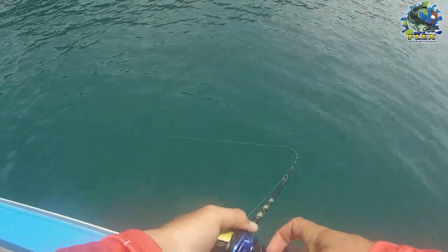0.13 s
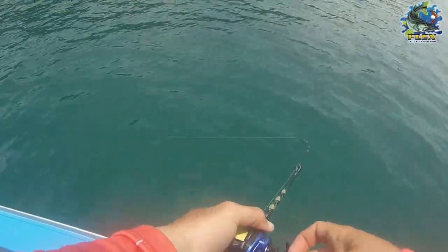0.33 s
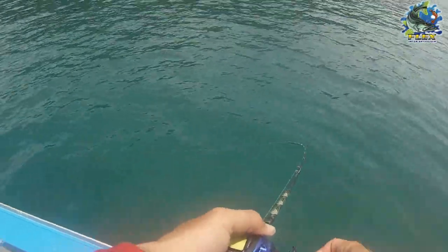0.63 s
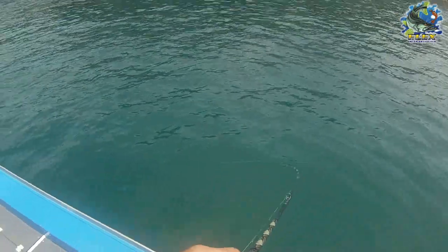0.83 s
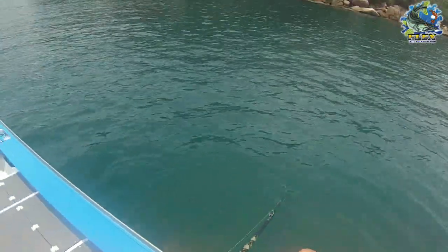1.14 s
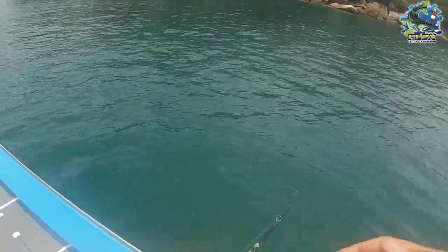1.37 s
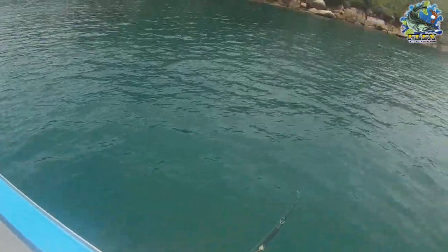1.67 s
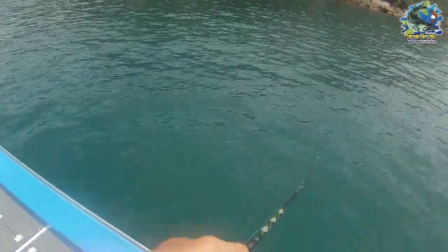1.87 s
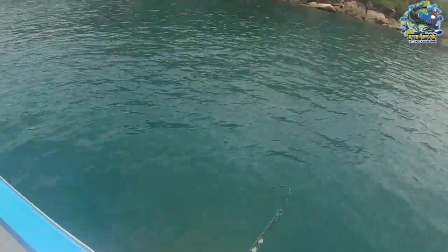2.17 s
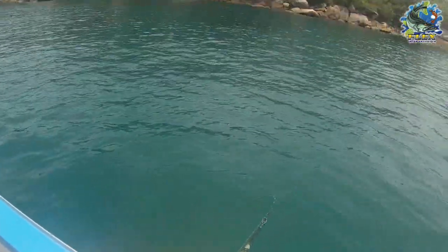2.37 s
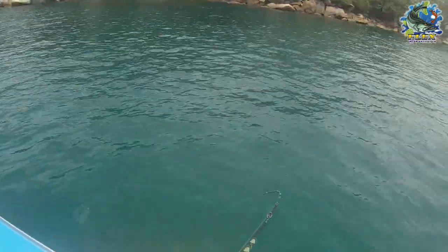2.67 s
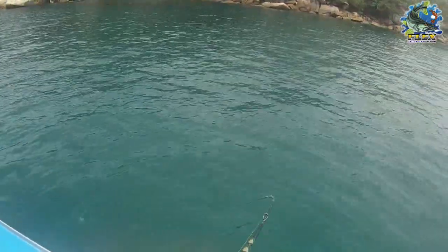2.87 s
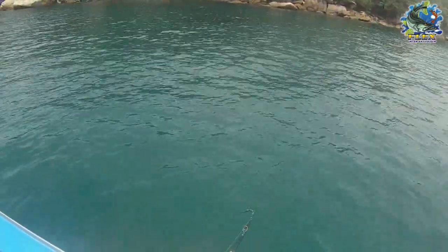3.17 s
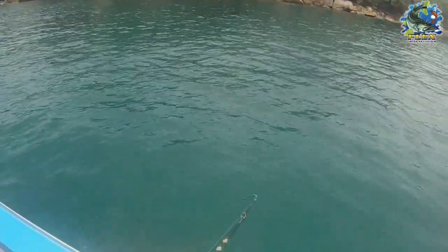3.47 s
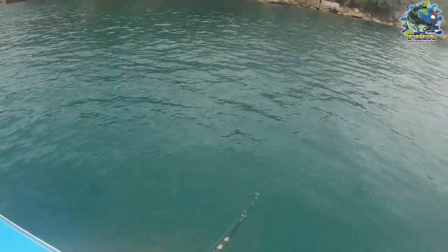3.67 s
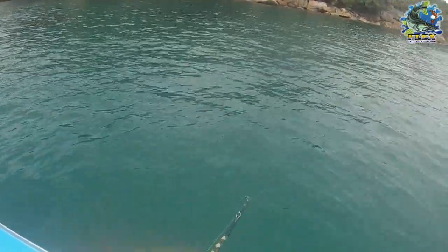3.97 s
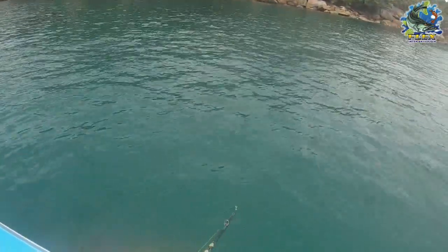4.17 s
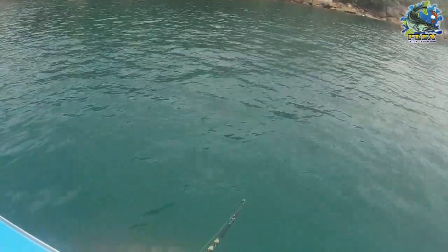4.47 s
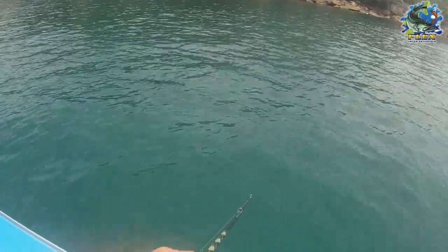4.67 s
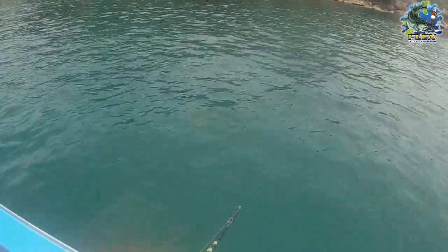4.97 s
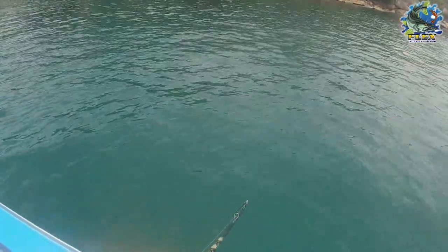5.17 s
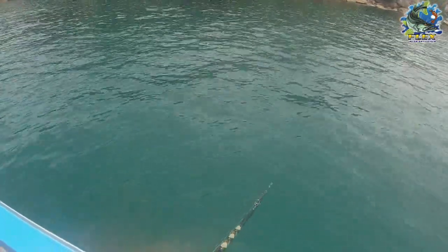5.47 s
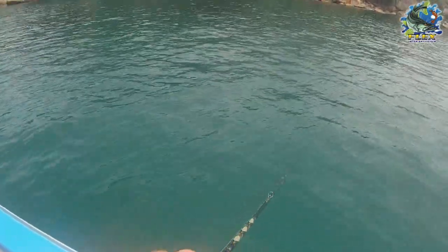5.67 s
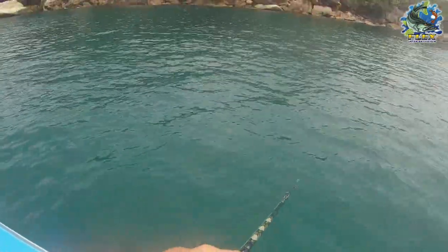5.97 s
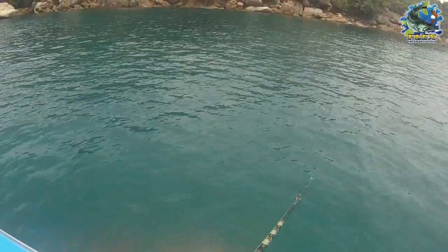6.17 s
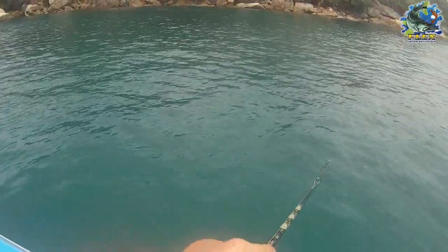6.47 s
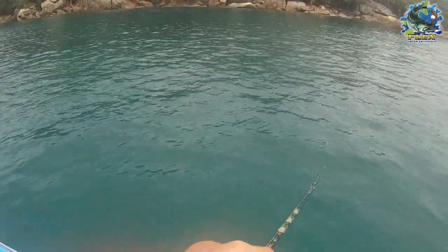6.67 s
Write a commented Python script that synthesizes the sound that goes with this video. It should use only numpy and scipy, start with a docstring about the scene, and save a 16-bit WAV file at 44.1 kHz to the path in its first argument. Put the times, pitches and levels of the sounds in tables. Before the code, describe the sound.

Feet and fishing gear bump and scrape against a small boat, thinning to occasional knocks while calm water laps quietly.

```python
"""Feet and gear knock against the hull of a small boat as someone fishes on calm water.
Each blow is a short rattle of contacts that excites the modes of the hull's panels and rebounds once.
Tackle clicks and rings, gear slides by stick-slip friction, a reel whirrs and the line hisses.
Behind these, water laps and plops, two faint whistles rise, and light wind rumbles on the microphone."""
import sys
import numpy as np
from scipy import signal
from scipy.fft import rfft, irfft
from scipy.io import wavfile

SR = 44100
rng = np.random.default_rng(int(sys.argv[2]) if len(sys.argv) > 2 else 0)


def bounce(signal):
    """Save signal as a 16-bit WAV file at the path given by the first command-line argument."""
    frames = np.transpose(np.atleast_2d(signal))
    limited = np.clip(frames, -1, 1)
    pcm = np.round(limited * 32767).astype(np.int16)
    wavfile.write(sys.argv[1], SR, pcm)


N = 300321
TIME = np.arange(N) / SR
LEAD = 512  # samples of padding on each side of a blow

# normal modes of the hull: f/Hz, relative level/dB, T60/s
HULL_MODES = [(55.5, -9.5, 0.3), (159, -8.5, 0.14), (219.6, 1, 0.21), (266.1, 1, 0.27), (335, 4.5, 0.124),
              (372, 3, 0.167), (463.2, 4, 0.13), (571.5, 0.5, 0.12), (611.5, -3.5, 0.12), (757, 2, 0.082),
              (783, 0, 0.025), (993, 3, 0.089), (1090, -9, 0.11), (1314, -7, 0.13), (1706, -1.5, 0.039),
              (1904, -2, 0.035), (2715, -5.5, 0.037), (2823, -9.5, 0.1), (2920, 0.5, 0.03),
              (3720, -3, 0.032), (4400, -16, 0.016), (5290, -9.5, 0.045), (5400, -16, 0.039)]
# normal modes of a metal fitting: f/Hz, relative level/dB, T60/s
FITTING_MODES = [(1240, 7, 0.051), (1715, 5.5, 0.066), (2270, -3, 0.07), (3030, -9, .05),
                 (3550, -10, 0.046), (4100, 0, 0.052), (5060, -3.5, .055), (5450, -5.5, 0.068),
                 (7620, -12, 0.056), (7900, -15, 0.028), (9940, -13, 0.069), (10380, -19, .03)]


def undb(db):
    """Amplitude ratio of a level in decibels."""
    return 10 ** (np.asarray(db) / 20)


def unit(x, count=None):
    """Normalise to rms 1, taken over the first count samples (default: all)."""
    return x / np.sqrt(np.mean(x[:count] ** 2) + 1e-18)


def at(points, hz):
    """Interpolate (f/Hz, value) points on a logarithmic frequency axis."""
    f, value = np.transpose(points)
    return np.interp(np.log(np.maximum(hz, 1)), np.log(f), value)


def colour(x, points):
    """Spectral shaping by (f/Hz, level/dB) points; rms 1."""
    gain = undb(at(points, np.fft.rfftfreq(len(x), 1 / SR)))
    return unit(irfft(rfft(x) * gain, len(x)))


def band(x, lo_hz, hi_hz, order=2):
    """Causal band-pass filter."""
    edges = [lo_hz, min(hi_hz, SR / 2 - 1000)]
    return signal.sosfilt(signal.butter(order, edges, "band", fs=SR, output="sos"), x)


def fade(t, t60):
    """Exponential decay by 60 dB in t60."""
    return np.exp(-np.log(1000) * t / t60)


def swell(start, length, attack, t60):
    """Envelope: linear attack, hold until start + length, exponential decay; all in s."""
    age = TIME - start
    return np.clip(age / attack, 0, 1) * fade(np.maximum(age - length, 0), t60)


def walk(rate_hz):
    """Random modulation: straight lines between Gaussian values, spread near 1."""
    knots = rng.standard_normal(1000)
    return np.interp(TIME * rate_hz, np.arange(len(knots)), knots)


def grains(size, spread_db):
    """Granular noise: dense impulses with log-normal weights; rms 1."""
    return unit(rng.standard_normal(size) * undb(spread_db * rng.standard_normal(size)))


def add(out, start, x):
    """Superpose x on out from start/s."""
    i = int(start * SR)
    out[i:i + len(x)] += x[:N - i]


def modal_response(modes, t, scatter=0.):
    """One damped sine per mode; a random point of contact sets its sign and slight detuning."""
    chance = rng.standard_normal((len(modes), 2))
    return sum(np.sign(side) * undb(db) * fade(t, t60)
               * np.sin(2 * np.pi * hz * (1 + scatter * shift) * t)
               for (hz, db, t60), (side, shift) in zip(modes, chance))


def registers(x):
    """Complementary filters split x into thump, body, clack and crack, from low to high."""
    # crossovers between the registers: f/Hz
    crossovers = (150, 700, 2200)
    f, spectrum = np.fft.rfftfreq(len(x), 1 / SR), rfft(x)
    lowpasses = [0, *(1 / (1 + (f / hz) ** 8) for hz in crossovers), 1]
    return [irfft(spectrum * (upper - lower)) for lower, upper in zip(lowpasses, lowpasses[1:])]


def microphone_hiss(level_db=-69.5):
    """Self-noise of the microphone: steady and broadband."""
    # noise spectrum: f/Hz, relative level/dB
    spectrum = [(1000, -1.5), (6000, -1), (11000, -6), (12500, -7), (15000, -21)]
    return undb(level_db) * colour(rng.standard_normal(N), spectrum)


def wind(breeze_db=-53, gust_width_s=0.23, buffet_db=3):
    """Turbulent pressure on the microphone makes a rumble that swells in gusts."""
    # gusts: t/s, rise in level/dB
    gusts = [(2.35, 5), (5.5, 3), (6.78, 7)]
    # rumble spectrum: f/Hz, relative level/dB
    spectrum = [(15, -20), (30, 8), (50, -0.5), (80, 0), (130, -4), (300, -43), (1000, -46.5)]
    gust_db = sum(db * np.exp(-((TIME - peak) / gust_width_s) ** 2) for peak, db in gusts)
    return colour(rng.standard_normal(N), spectrum) * undb(breeze_db + gust_db + buffet_db * walk(9))


def water_and_rustle(ripple_db=4, lap_db=-5, lap_spread_db=4):
    """Amplitude-modulated noise: ripples, laps that sound in the hull, and a brief handling rustle."""
    # level of water ripples and laps, with a swell of handling rustle near 0.7 s
    # as the reel is cranked: t/s, level/dB
    levels = [(0, -54), (.42, -55.5), (.7, -44.5), (1.3, -53), (2.05, -48), (2.9, -54.5), (4.1, -55.5),
              (4.35, -49.5), (5.1, -52), (6.8, -51.5)]
    # ripple spectrum: f/Hz, relative level/dB
    spectrum = [(100, -19), (170, -1), (243, -8), (310, -6.5), (442, -7), (523, -5), (776, -8), (1150, -10),
                (1470, -16), (1770, -15), (2140, -25), (2990, -24.5), (3480, -29.5), (5350, -32.5),
                (8000, -46), (15000, -73)]
    ripples = colour(grains(N, 5.6), spectrum) * undb(ripple_db + 0.69 * walk(14))
    laps = unit(band(rng.standard_normal(N), 210, 495)) * undb(lap_db + lap_spread_db * walk(8.1))
    return undb(np.interp(TIME, *np.transpose(levels))) * (ripples + laps)


def whistles(waver=0.016, flutter_db=4):
    """Frequency-modulated tones, thin and unsteady, swell and fade as their pitch rises and levels off."""
    # glides: t/s, duration/s, first f/Hz, last f/Hz, level/dB
    glides = [(3.39, .21, 6000, 7300, -73), (3.44, .19, 5150, 6200, -74)]
    out = np.zeros(N)
    for start, length, first_hz, last_hz, db in glides:
        progress = np.clip((TIME - start) / length, 0, 1)
        hz = (last_hz + (first_hz - last_hz) * (1 - progress) ** 2) * (1 + waver * walk(140))
        envelope = undb(db + flutter_db * walk(90)) * np.sin(np.pi * progress)
        out += envelope * np.sin(2 * np.pi * np.cumsum(hz) / SR)
    return out


def line_rubbing(grain_db=6, uneven_db=2):
    """Sliding friction of line and grip gives short, grainy hisses."""
    # strokes: t/s, duration/s, level/dB
    strokes = [(1.721, 0.041, -45), (1.807, 0.024, -43), (2.262, 0.025, -40)]
    # friction spectrum: f/Hz, relative level/dB
    spectrum = [(800, 1), (2000, 12.5), (5000, 5), (7200, -3), (9000, -8.5), (12500, -3.5), (15000, -3)]
    envelope = sum(undb(db) * swell(start, length, attack=0.02, t60=0.12) for start, length, db in strokes)
    return colour(grains(N, grain_db), spectrum) * envelope * undb(uneven_db * walk(43.64))


def reel(level_db=-52, usual_hz=2540, db_per_octave=10, whirr_db=-3, rub_db=-2, half_width_hz=260):
    """Gears whirr as narrow-band noise that follows the crank; line and bearings rub. Faster is louder."""
    # gear whirr under uneven cranking: t/s, f/Hz
    turns = [(.45, 1900), (.59, 2240), (.68, 2850), (.76, 2190), (.865, 3300), (.95, 2320), (1.005, 3100),
             (1.08, 2125), (1.2, 1900)]
    # friction spectrum of line and bearings: f/Hz, relative level/dB
    spectrum = [(300, 4), (900, -18), (1700, 6), (2300, 9.5), (2650, -9), (3050, 9.5), (3500, -6),
                (5500, -9), (8000, -47), (14000, -33)]
    hz = np.interp(TIME, *np.transpose(turns))
    phase = 2 * np.pi * np.cumsum(hz) / SR
    lowpass = signal.butter(2, half_width_hz, fs=SR, output="sos")
    quadrature = unit(signal.sosfilt(lowpass, rng.standard_normal((2, N))))
    whirr = quadrature[0] * np.cos(phase) + quadrature[1] * np.sin(phase)
    rub = colour(grains(N, 5), spectrum)
    cranking = swell(start=0.35, length=0.79, attack=0.19, t60=0.3)
    gain = undb(level_db + db_per_octave * np.log2(hz / usual_hz) + walk(35.5))
    return cranking * gain * (undb(whirr_db) * whirr + undb(rub_db) * rub)


def sliding_gear(jerk_db=4, scratch_db=-9, hum_hz=152, hum_db=-43.5, waver=0.023):
    """Stick-slip friction drives the hull's low modes and a metal fitting; one panel hums along."""
    # arms and gear dragging on the hull: t/s, duration/s, level/dB
    drags = [(0.43, 0.62, -41.5), (1.582, 0.22, -39.5), (2.06, 0.34, -39), (4.142, .29, -38)]
    # gear jerking over the fitting: t/s, level/dB
    slips = [(4.11, -41), (4.174, -50), (4.22, -49.5), (4.257, -48), (4.292, -49), (4.379, -49),
             (4.481, -53.5), (4.63, -57.5), (4.7, -60.5)]
    t = np.arange(2 ** 14) / SR
    friction = grains(N, 6) * undb(jerk_db * walk(56))
    hull = unit(band(signal.fftconvolve(friction, modal_response(HULL_MODES, t))[:N], 147, 600))
    fitting = unit(signal.fftconvolve(friction, modal_response(FITTING_MODES, t))[:N])
    scratch = undb(scratch_db) * unit(band(friction, 940, 4000, order=1))
    hum_phase = 2 * np.pi * np.cumsum(hum_hz * (1 + waver * walk(25))) / SR
    hum = unit(np.sin(hum_phase) * undb(jerk_db * walk(38)))
    dragging = sum(undb(db) * swell(start, length, attack=0.023, t60=1) for start, length, db in drags)
    slipping = sum(undb(db) * swell(start, 0.014, attack=0.0076, t60=0.16) for start, db in slips)
    humming = undb(hum_db) * swell(start=4.27, length=0.6, attack=0.056, t60=0.99)
    return dragging * hull + slipping * (fitting + scratch) + humming * hum


def rings_and_plops(rise_s=0.0036):
    """Damped oscillators, most gliding in pitch; a plop glides as its air pocket changes."""
    # rings of gear, hollow booms and plops: t/s, f/Hz, level/dB, T60/s, relative glide/(1/s)
    tones = [(.628, 730, -5.5, 0.048, 2.7), (0.63, 973, -17, 0.13, -.19), (.993, 107, -29.5, 0.14, .85),
             (1.796, 45.3, -26, .13, 6), (2.354, 7530, -50, 0.2, 0), (3.029, 1680, -41, 0.59, 0),
             (3.029, 4980, -56, 0.51, -0.5), (3.064, 493, -17.5, 0.088, .41),
             (3.937, 119, -27.5, 0.43, 0.6), (4.864, 1303, -24.5, 0.18, 1.2),
             (4.865, 2805, -22.5, 0.074, -1), (4.867, 3004, -22, 0.069, -3.5),
             (4.869, 5150, -20, 0.041, 1.2), (5.255, 660, -25, 0.031, 0), (5.365, 501, -35.5, 0.32, 1.7),
             (6.748, 2940, -29.5, .06, 0.5)]
    out, t = np.zeros(N), np.arange(2 ** 14) / SR
    for start, hz, db, t60, glide in tones:
        envelope = undb(db) * (1 - np.exp(-t / rise_s)) * fade(t, t60)
        add(out, start, envelope * np.sin(2 * np.pi * hz * (t + glide * t ** 2 / 2)))
    return out


def tackle_clicks(edge_ratio=1.41):
    """Hard, heavily damped contacts radiate octave-wide bursts of noise."""
    # snaps of gear and tackle: t/s, level over the first 3 ms/dB, centre f/Hz, T60/s
    snaps = [(0.43, -55, 4500, 0.015), (0.595, -39, 2680, 0.02), (1.064, -61, 5500, .04),
             (1.281, -50, 2560, 0.017), (1.358, -43, 2860, .015), (1.3735, -37, 870, 0.012),
             (1.375, -47.5, 5000, .02), (1.7012, -41.5, 4900, .053), (1.709, -30.5, 2600, 0.0075),
             (1.795, -22, 1460, 0.02), (1.795, -34.5, 3860, 0.022), (2.001, -22.5, 4100, .007),
             (2.002, -30.5, 1500, 0.011), (2.036, -18, 3400, 0.016), (2.038, -7.5, 810, 0.0038),
             (2.0351, -16.5, 2130, 0.016), (2.102, -46, 5570, 0.026), (2.139, -29, 780, 0.039),
             (2.21, -43, 900, .02), (2.245, -44.5, 4830, .0097), (2.354, -32, 1100, 0.018),
             (2.354, -44, 6600, .04), (2.421, -40, 1020, 0.016), (3.028, -56, 8400, 0.049),
             (3.083, -45, 4150, 0.094), (3.187, -56, 4170, 0.058), (3.919, -47.5, 7400, 0.042),
             (4.8657, -30, 1630, 0.027), (4.871, -34, 4450, .045), (6.175, -54, 3200, .015),
             (6.489, -56, 3200, .018), (6.682, -48.5, 4870, 0.0081), (6.749, -36, 2000, 0.021)]
    out, t = np.zeros(N), np.arange(2 ** 12) / SR
    for start, db, hz, t60 in snaps:
        burst = rng.standard_normal(len(t)) * fade(t, t60)
        snap = band(burst, hz / edge_ratio, hz * edge_ratio, order=3)
        add(out, start, undb(db) * unit(snap, count=130))
    return out


def dense_modes(t, direct_db=9, direct_t60=0.028):
    """Overlapping hull modes merge into noise: a direct burst, then a tail whose lows ring longest."""
    # spectrum of the ringing: f/Hz, relative level/dB
    spectrum = [(25, -9), (60, -19), (130, -2), (185, 1.5), (300, 3), (900, 4), (1700, -8.5), (2250, -14.5),
                (2900, -19.5), (3500, -12.5), (4500, -14.5), (5400, -24), (6400, -44), (10000, -35.5),
                (15000, -63)]
    # its decay times: f/Hz, T60/s
    decay_times = [(60, 1), (300, 0.53), (900, 0.21), (2500, 0.11), (12000, 0.15)]
    f = np.fft.rfftfreq(len(t), 1 / SR)
    noise = rfft(rng.standard_normal(len(t))) * undb(at(spectrum, f))
    edges = np.geomspace(20, 20480, 21)  # half-octave bands
    direct = undb(direct_db) * fade(t, direct_t60)
    out = np.zeros(len(t))
    for lo, hi in zip(edges, edges[1:]):
        tail = fade(t, at(decay_times, np.sqrt(lo * hi)))
        out += irfft(noise * ((f >= lo) & (f < hi))) * (direct + tail)
    return out


def blow(thump_db, clack_db, crack_db, panel_hz, contact_ms, fitting_db=-15, note_db=-4, note_t60=0.092):
    """Impact: a chattering contact force convolved with the impulse response of hull and fittings."""
    t = np.arange(2 ** 14) / SR
    attack = slice(LEAD, LEAD + SR // 40)  # the registers are balanced over these 25 ms
    age = t * 1000 / contact_ms
    push = 2 * age * np.exp(1 - 2 * age)
    force = push * grains(len(t), 6)
    force[0] += undb(11)  # first touch
    force[np.argmax(push)] += undb(17)  # hard contact at the height of the push
    hull = unit(modal_response(HULL_MODES, t, scatter=0.028)) + unit(dense_modes(t))
    fittings = undb(fitting_db) * unit(modal_response(FITTING_MODES, t, scatter=0.048))
    ring = np.pad(signal.fftconvolve(force, hull + fittings)[:len(t)], LEAD)
    ring = colour(ring, [(500, 0.028), (2500, crack_db + 20)])  # a harder blow favours the upper modes
    thump, body, clack, crack = (x / np.std(x[attack]) for x in registers(ring))
    # the struck panel swells while it is pushed, then rings out on its own note
    envelope = signal.fftconvolve(push, fade(t, note_t60))[:len(t)]
    note = np.pad(envelope * np.sin(2 * np.pi * panel_hz * t), LEAD)
    body += undb(note_db) * np.sign(note @ body) * note / np.std(note[attack])  # signed to reinforce
    body /= np.std(body[attack])
    return undb(thump_db - 3) * thump + body + undb(clack_db) * clack + undb(crack_db) * crack


def hull_knocks(rebound_s=0.037, rebound_contact_ms=7.4, dull_db=-4):
    """Partly elastic collisions: each blow on the hull rebounds and lands again with less treble."""
    # blows: t/s, body level/dB, thump/dB, clack/dB, crack/dB, panel f/Hz, contact/ms, rebound/dB
    # thump, clack, crack and rebound are relative to the body; blow() lowers the thump by 3 dB more
    impacts = [(0.429, -41, -9, -6, -12.5, 592, 2.4, -19), (0.502, -40, 2, -8, -23, 238, 5.7, -11),
               (0.627, -16.5, -22, -9.5, -26, 364, 4.7, -22),
               (0.646, -20.5, -22, -10.5, -25, 259.7, 9.2, -22), (0.705, -34.5, -11, -3, -27, 303, 27, -18),
               (1.055, -34.5, -14, -17, -19.5, 205, 15, -16), (1.371, -26.5, -2, -14, -21.5, 331, 9.5, -12),
               (1.538, -36, -22, -5.5, -7.5, 290, 16, -18), (1.577, -15.5, -16, -10, -26.5, 323, 7.2, -12),
               (1.701, -34.5, -8, -1.5, -16, 451, 11.6, -5), (1.845, -21, -19, -6.5, -26.5, 334, 6.2, -30),
               (1.975, -38, -5, -4, -18.5, 510, 10.5, 3.5), (2.033, -15.5, -7, -3, -16, 621, 3.05, -34),
               (2.091, -31, -2, -20, -25, 320, 7.7, -9), (2.136, -30.5, 5, -21, -41, 203, 3.1, -23),
               (2.255, -18.5, 1.5, -6, -22.5, 243, 9.28, -19), (2.352, -19, -10, -7, -21.5, 250, 9, -7.5),
               (2.418, -22, -5, -10, -26, 281, 9.3, -12.5), (2.795, -30.5, -30, -3, -21.5, 385, 6, -9.5),
               (3.028, -36, -23, -2.5, -9, 312, 6.2, -6), (3.062, -18, -7.5, -16, -33, 306, 4.54, -11),
               (3.837, -36.5, -2.5, -38, -45, 225.5, 4.6, -2.5),
               (3.918, -35, -1, -1.5, -8.5, 972, 6.1, -34), (4.112, -35.5, -7, -4.5, -21, 314, 14, -21),
               (4.298, -25, -11.5, -18.5, -37, 340.5, 10.8, -8),
               (4.864, -20, -17.5, -6.5, -10.5, 352, 7, -6), (6.668, -29, -12, -9.5, -23, 307, 12, -5.5),
               (6.747, -35, -3, 1.5, -12.5, 996, 7.5, -25)]
    out = np.zeros(N)
    for onset, db, thump, clack, crack, panel_hz, contact_ms, rebound_db in impacts:
        start = onset - LEAD / SR
        add(out, start, undb(db) * blow(thump, clack, crack, panel_hz, contact_ms))
        rebound = blow(thump, clack + dull_db, crack + dull_db, panel_hz, rebound_contact_ms)
        add(out, start + rebound_s, undb(db + rebound_db) * rebound)
    return out


def scene():
    """Free-field superposition of all sources at one microphone."""
    hiss = microphone_hiss()
    transients = hull_knocks() + tackle_clicks() + rings_and_plops()
    handling = reel() + line_rubbing() + sliding_gear()
    return (transients + handling + whistles() + water_and_rustle() + wind() + hiss)[None]


def record(dry, dull_hz=12500, cutoff_hz=15000):
    """Clipping at full scale, then band limiting: the microphone dulls the top, a steep filter cuts it."""
    dull = signal.sosfilt(signal.butter(2, dull_hz, fs=SR, output="sos"), np.clip(dry, -1, 1))
    return signal.sosfilt(signal.ellip(8, .2, 70, cutoff_hz, fs=SR, output="sos"), dull)


dry = scene()
out = record(dry)
bounce(out)
```